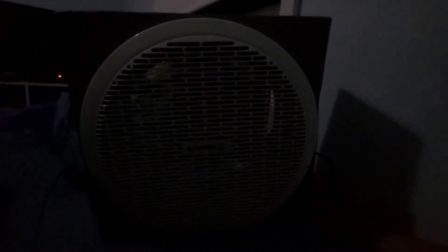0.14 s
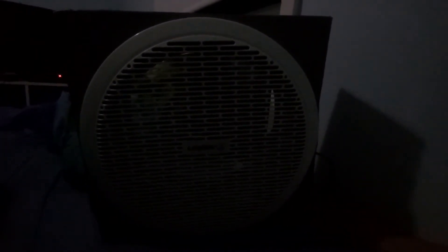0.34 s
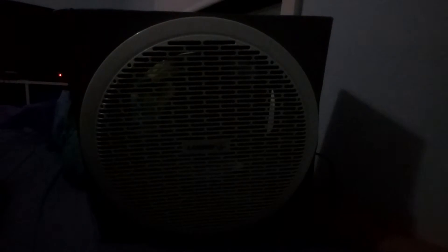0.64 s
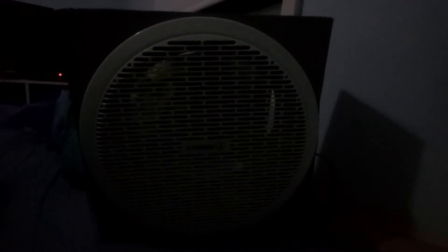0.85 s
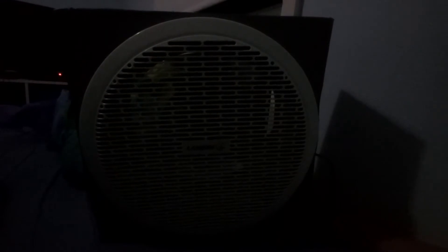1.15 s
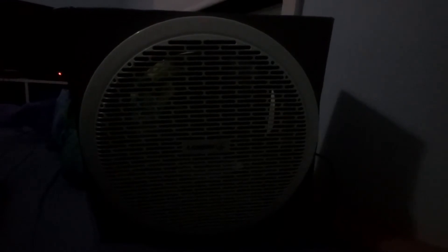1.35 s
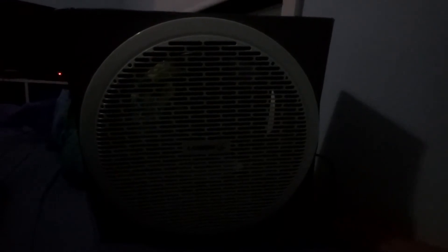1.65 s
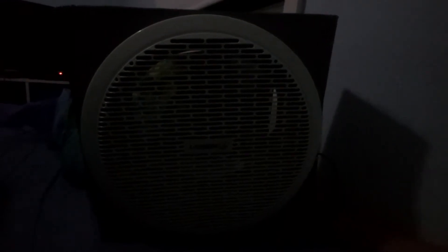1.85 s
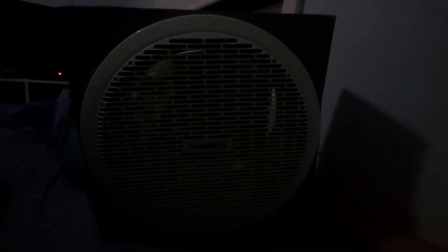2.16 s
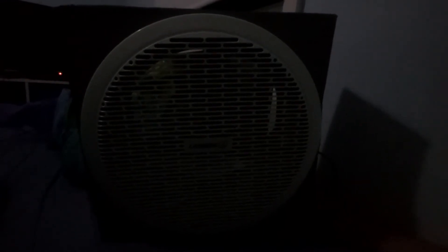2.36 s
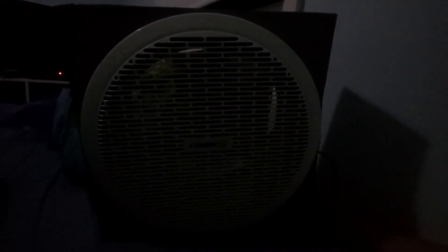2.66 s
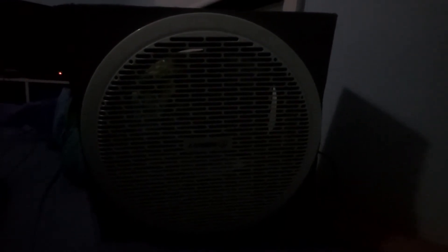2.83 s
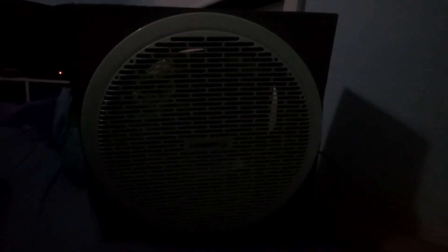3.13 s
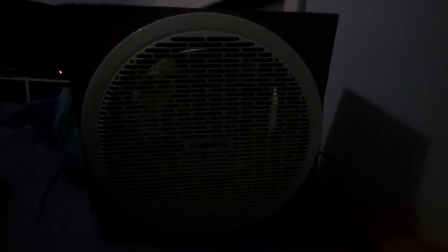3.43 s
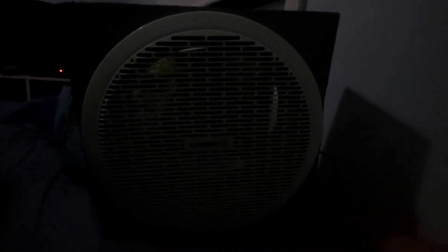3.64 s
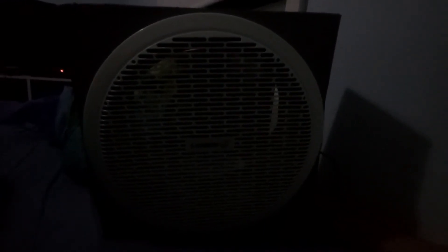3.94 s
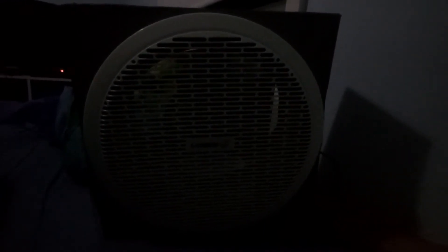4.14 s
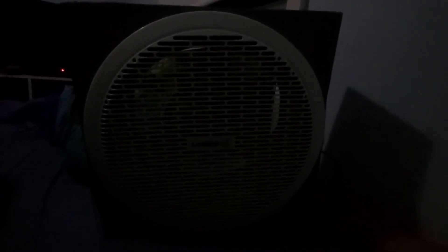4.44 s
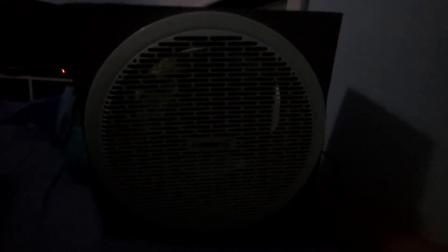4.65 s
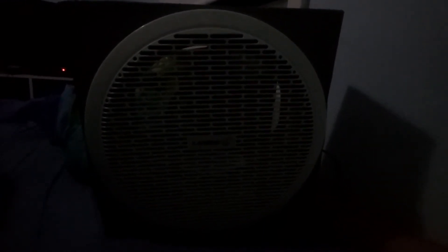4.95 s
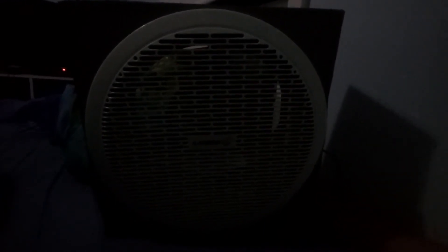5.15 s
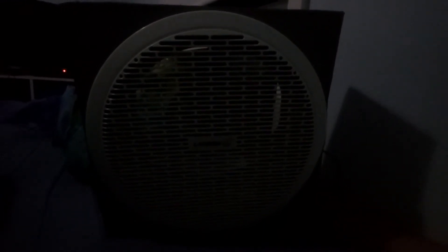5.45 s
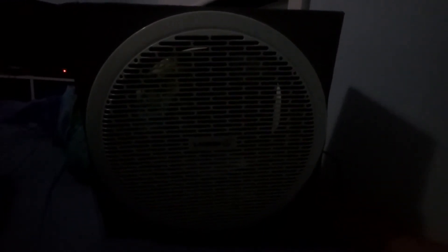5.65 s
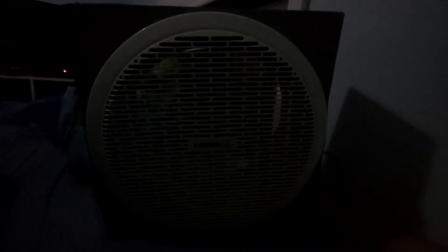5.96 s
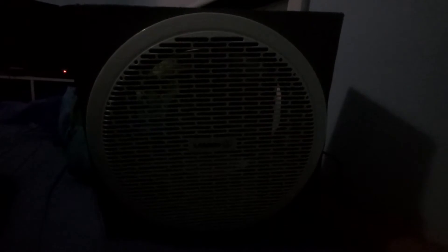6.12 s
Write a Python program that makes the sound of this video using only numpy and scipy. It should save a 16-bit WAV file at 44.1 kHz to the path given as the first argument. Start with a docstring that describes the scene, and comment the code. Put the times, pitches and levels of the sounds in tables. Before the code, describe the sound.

Close stereo pickup of a three-bladed fan behind a round grille. It is running from the start and speeds up, fast at first, then ever more gradually. Broad airy rush swells over a throbbing bass drone and softer blade tones; a tiny click appears early. Motor hum strengthens as the fan nears full speed, and the small room and housing give the wind a boxy, hollow colour until the end.

```python
"""A rush of air gets louder and brighter, then settles, as a three-bladed exhaust fan behind a round grille
gathers speed, heard from close by in a small room.
The rush is noise shaped by resonances of housing and room. The blades add sine tones at multiples of the
shaft rate, eddies at their tips add blurred drones, and the motor hums at twice the mains rate.
One thin tick, a sudden step that dies away at once, is heard early on."""
import sys
import numpy as np
from scipy import signal
from scipy.fft import rfft, irfft, next_fast_len
from scipy.io import wavfile

SR = 44100
rng = np.random.default_rng(int(sys.argv[2]) if len(sys.argv) > 2 else 0)


def put_to_file(sound):
    """Save the sound as 16-bit audio at rate SR, in the file named by the first command-line argument."""
    columns = np.atleast_2d(sound).T  # one column per channel
    safe = np.clip(columns, -1, 1)
    whole_steps = np.round(safe * 32767)
    wavfile.write(sys.argv[1], SR, whole_steps.astype(np.int16))


N = 277389  # length of the sound in samples

FULL_HZ = 28.67  # shaft turns per second at full speed

# How far the sound at the left ear runs ahead of the right: pitch_hz, lead_radians
EAR_LEAD = [(40, 0.9), (82, 0.45), (105, 0.55), (140, -0.15), (190, 0.16), (275, 0.17), (480, 0.51),
            (570, 1.72), (780, -0.22), (1300, 0.56), (1620, -1.2), (2150, 1.88), (2400, 0.25), (6000, 0.13)]


def undb(db):
    """Turn decibels into a gain to multiply by."""
    return 10 ** (np.asarray(db) / 20)


def on_log_axis(hz, points, column=1):
    """Read one column of a table, joined by straight lines over log frequency."""
    points = np.array(points)
    # the tiny offset avoids the logarithm of zero
    return np.interp(np.log(hz + 1e-3), np.log(points[:, 0]), points[:, column])


def swell(points):
    """Gain over time, from a table of start_s, level_db."""
    times_s, levels_db = np.array(points).T
    return undb(np.interp(np.arange(N) / SR, times_s, levels_db))


def walk(rate):
    """Smooth random drift of unit spread that changes about `rate` times a second."""
    size = next_fast_len(N)
    hz = np.fft.rfftfreq(size, 1 / SR)
    keep_slow = np.exp(-(hz / rate) ** 2) * (hz > 0)
    drift = irfft(rfft(rng.standard_normal(size)) * keep_slow, size)[:N]
    return drift / drift.std()


def colour_db(hz):
    """Strength of the rush at each frequency for the left and right ear, with resonances of housing and room."""
    # Rush at full speed before the resonances: pitch_hz, left_db (per Hz), right_db (per Hz)
    rush_levels = [(20, -82, -79), (38, -81, -78), (63, -66.5, -70), (308.5, -52.5, -53.5),
                   (580, -61.5, -62), (962, -60.5, -63.5), (1542, -67.5, -81.5), (2020, -78, -75),
                   (2910, -81, -80.5), (5150, -92, -88.5), (6670, -91, -89.5), (8550, -102.5, -100),
                   (11700, -102, -100), (13700, -106, -105.5), (14900, -101, -105)]
    # Resonances of housing and room: pitch_hz, width_hz, left_lift_db, right_lift_db
    resonances = [(65.4, 39, 9.5, 13), (95, 24, -3, -4), (127.6, 45, 6.5, 11.5), (169.4, 16, 1, 7),
                  (184, 22, -3, -3), (218, 19, 3.5, -1), (267, 26, 0.5, -2.5), (292, 11, 0, 3),
                  (332, 52, 1, 2.5), (378, 34, 0, 0.5), (431, 25, 3.5, 6.5), (513, 42, 1, 5.5),
                  (587, 23, 5, 1), (603, 27, -1, 8.5), (664, 75, 4, -4.5), (755, 110, 4, -0.5),
                  (841, 46, 4.5, -6), (887, 22, 2.5, 3.5), (938, 30, 4, -4), (1018, 40, 2, -1),
                  (1240, 80, 1, 0.5), (1436, 267, 2, 10.5), (1679, 130, 2.5, 9), (1854, 200, -0.5, 8.5),
                  (2200, 44, 5, 4), (2306, 245, 4, 4), (2920, 110, -1.5, -2.5), (3160, 330, -4.5, 1),
                  (4000, 300, 3, 0), (7160, 610, 7.5, -3.5)]
    levels_db = np.array([on_log_axis(hz, rush_levels, column) for column in (1, 2)])
    for centre, width, *lift_db in resonances:
        bump = np.exp(-2 * ((hz - centre) / width) ** 2)
        levels_db += np.outer(lift_db, bump)
    return levels_db


def air(speed, flutter_db=0.7, gust_db=0.2):
    """Turbulence off blades and grille, coloured by the resonances; the treble grows fastest with speed."""
    # Likeness of the air at the two ears: pitch_hz, coherence (0 to 1)
    likeness = [(40, 0.8), (75, 0.9), (100, 0.89), (135, 0.93), (185, 0.91), (290, 0.98), (470, 1),
                (620, 0.15), (950, 0.73), (1200, 0.13), (1900, 0.27), (2300, 0.8), (2700, 0), (9000, 0.1)]
    # Level of the low roar of the housing, on top of its growth with speed: start_s, level_db
    roar_swell = [(0, -1.5), (0.55, 1.2), (1.2, 1.1), (1.58, -1), (1.77, 2.7), (1.98, -0.5), (2.5, 1),
                  (2.75, -2), (3.25, 2.2), (3.47, -2.5), (3.65, 1.8), (4.3, 0.3), (4.75, -1), (5.35, 1),
                  (5.6, 1.2), (5.8, -0.5), (6.1, 3.5), (6.29, -0.5)]
    roar_hz = 350  # the octave band around this pitch carries the roar
    growth_power, growth_per_octave = 3.61, 0.6  # power of speed at 1 kHz, and its rise per octave
    hiss_hz, hiss_power = 8000, 1.8  # bands centred above this pitch come in later: added power of speed

    size = next_fast_len(N)
    hz = np.fft.rfftfreq(size, 1 / SR)
    # the right ear hears a mix of the left ear's noise and noise of its own
    left, other = rfft(rng.standard_normal((2, size)))
    alike = np.clip(on_log_axis(hz, likeness), 0, 1)
    right = alike * left + np.sqrt(1 - alike ** 2) * other
    right = right * np.exp(-1j * on_log_axis(hz, EAR_LEAD))
    # the square root makes the noise unit strength per hertz before colouring
    rush = np.array([left, right]) * undb(colour_db(hz)) * np.sqrt(SR / 2)

    octaves = np.arange(-3.5, 4)  # counted from 1 kHz
    centres = 1000 * 2 ** octaves
    powers = growth_power + growth_per_octave * octaves + hiss_power * (centres > hiss_hz)
    gusts = undb(gust_db * walk(rate=44))  # uneven inflow moves all bands together
    out = 0
    for centre, peak, power in zip(centres, np.eye(len(centres)), powers):
        in_roar = abs(np.log2(centre / roar_hz)) < 0.5
        roar = swell(roar_swell) if in_roar else 1
        # overlapping triangles that sum to one
        band = on_log_axis(hz, np.column_stack([centres, peak]))
        band_sound = irfft(rush * band, size)[:, :N]
        flutter = undb(flutter_db * walk(rate=20))
        out = out + band_sound * speed ** power * roar * flutter
    return out * gusts


def blades(speed, angle, waver=0.1):
    """Each blade-rate harmonic swells through resonances as it climbs; those above the first waver with inflow."""
    # Harmonics 1, 2, 3 and up, over one hertz of the rush: left_db, right_db, growth (power of speed)
    blade_tones = [(19.5, 19.5, 0), (9, 12.5, 6), (9.5, 5, 3.5), (12, 12.5, 3), (11, 6.5, 7), (11, 14, 5),
                   (14, 5, 6), (19, 11, 8), (12, 13, 4), (17, 9, 8), (11.5, 8, 5), (7, 4, 8), (4, 11, 6),
                   (15, 4, 7), (11, 5, 9)]
    # Level of the deepest tone over time: start_s, level_db
    deep_tone_swell = [(0, -6), (0.8, -3), (1.6, 0.5), (2.7, 1.5), (3.3, 2), (3.95, 5), (4.5, 1), (5.0, -2),
                       (5.6, -2), (6.0, 5), (6.29, 1)]
    blade_count = 3

    out = np.zeros((2, N))
    speeds = np.linspace(speed.min(), speed.max(), 64)  # speeds at which the resonances are looked up
    deepest = swell(deep_tone_swell)
    for harmonic, (*over_db, power) in enumerate(blade_tones, 1):
        multiple = harmonic * blade_count
        phase = multiple * angle + rng.uniform(0, 2 * np.pi)
        lead = on_log_axis(multiple * FULL_HZ, EAR_LEAD)
        gains = undb(colour_db(multiple * FULL_HZ * speeds) + np.array(over_db)[:, None])
        left, right = (np.interp(speed, speeds, gain) for gain in gains)
        level = deepest if harmonic == 1 else 1 + waver * walk(rate=5.1)
        # faster blades cut the air more sharply, so the high harmonics come in late
        strength = speed ** power * level
        out += strength * np.array([left * np.sin(phase), right * np.sin(phase - lead)])
    return np.sqrt(2) * out  # sine peak from average (RMS) level


def drones(speed, angle, power=2.0):
    """Eddies shed at the blade tips follow the shaft only loosely, so their pitch is blurred."""
    # Lower and upper drone, before swell and growth: multiple (of shaft rate), width_hz, left_db, right_db
    drone_bands = [(4.96, 2.8, -37, -34.6), (7.7, 5, -40, -39.5)]
    # Level of the lower drone, on top of its growth with speed: start_s, level_db
    lower_swell = [(0, 2), (0.6, 3.5), (1.5, 5.5), (1.95, 0), (2.25, 7.5), (2.65, 0), (3.0, 1), (3.2, 7),
                   (3.6, 1), (4.0, 2), (4.6, -2), (4.8, 3), (5.25, 0), (6.29, 0)]
    upper_power = 3.4  # added power of speed: the upper drone comes in late

    out = 0
    strengths = (swell(lower_swell), speed ** upper_power)
    for (multiple, width, *ear_db), strength in zip(drone_bands, strengths):
        eddies = walk(rate=width) + 1j * walk(rate=width)
        # they wander in phase and hold their strength, with brief dropouts
        eddies /= np.hypot(np.abs(eddies), 0.5)
        drone = np.real(eddies * np.exp(1j * multiple * angle))
        out = out + strength * np.outer(undb(ear_db), drone)
    return np.sqrt(2) * speed ** power * out


def motor(speed, angle, left_db=-37, right_db=-43, power=10, unbalance_db=-59):
    """The motor hums at twice the mains rate, louder near full speed; unbalance shakes it once a turn."""
    hum_hz = 100
    waver = undb(0.8 * walk(rate=1.1))  # slow drift in level, spread 0.8 dB
    hum = np.sin(2 * np.pi * hum_hz * np.arange(N) / SR) * speed ** power * waver
    shake = undb(unbalance_db) * np.sin(angle)
    return np.sqrt(2) * (np.outer(undb([left_db, right_db]), hum) + shake)


def ticks(decay_s=0.00004, ring_hz=2000, ring_db=-12, ring_s=0.0005):
    """A dry tick: a sudden step that dies away at once, with a very short ring on the left."""
    # When the tick comes and how high its step is: start_s, step_db
    tick_times = [(0.4655, -22)]
    out, t = np.zeros((2, N)), np.arange(N) / SR
    for start, db in tick_times:
        age = np.maximum(t - start, 0)
        out += undb(db) * (t >= start) * np.exp(-age / decay_s)
        ring = np.sin(2 * np.pi * ring_hz * age) * np.exp(-age / ring_s)
        out[0] += undb(db + ring_db) * ring
    return out


def scene():
    """The rotor nears full speed, fast at first and then ever more slowly, and drives all but the tick."""
    shortfall_hz, spin_up_s = 5.65, 2.15  # shaft rate missing at the start, time constant of the climb
    speed = 1 - shortfall_hz / FULL_HZ * np.exp(-np.arange(N) / SR / spin_up_s)  # share of full speed
    angle = 2 * np.pi * np.cumsum(FULL_HZ * speed) / SR  # shaft angle in radians
    return air(speed) + blades(speed, angle) + drones(speed, angle) + motor(speed, angle) + ticks()


def record(dry):
    """A steep low-pass filter cuts off the very top of the treble."""
    top_hz = 15750
    low_pass = signal.firwin(401, top_hz, fs=SR, window="blackman")
    return signal.fftconvolve(dry, low_pass[None], "same", axes=1)


dry = scene()
out = record(dry)
put_to_file(out)
```